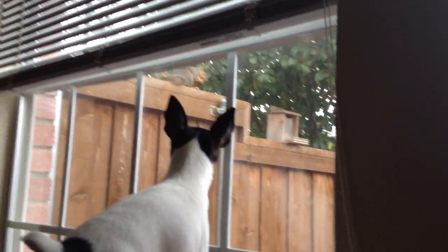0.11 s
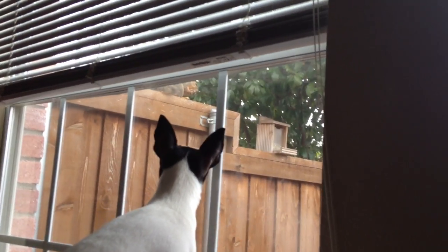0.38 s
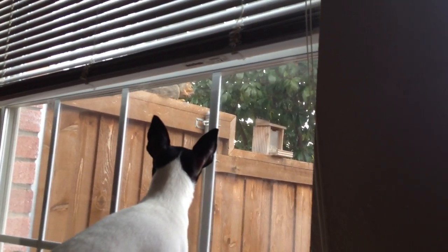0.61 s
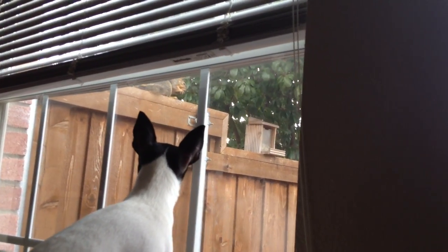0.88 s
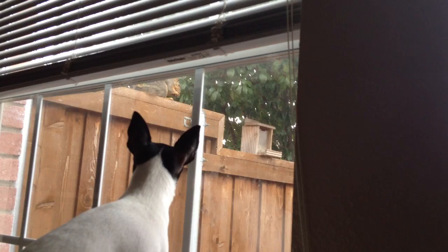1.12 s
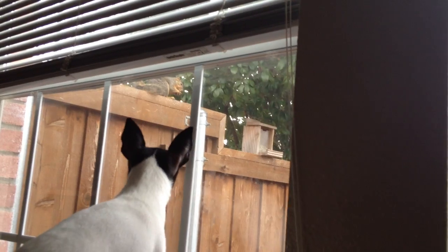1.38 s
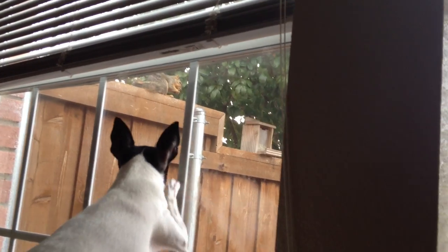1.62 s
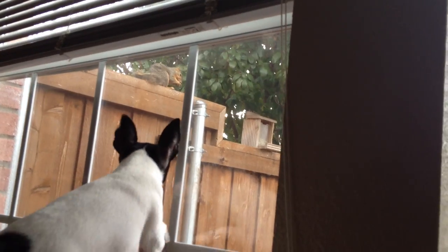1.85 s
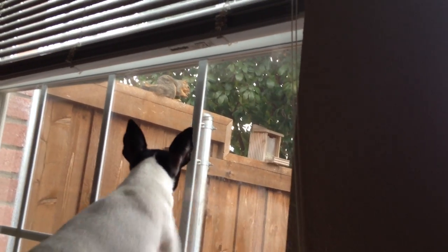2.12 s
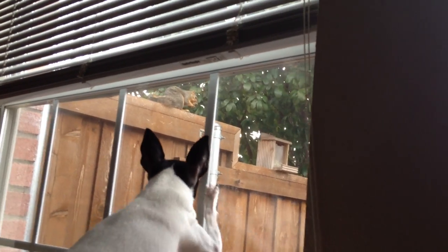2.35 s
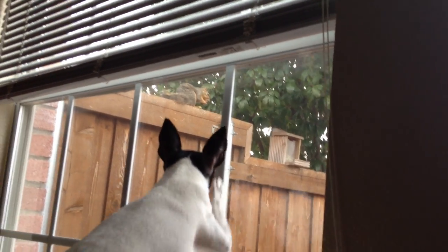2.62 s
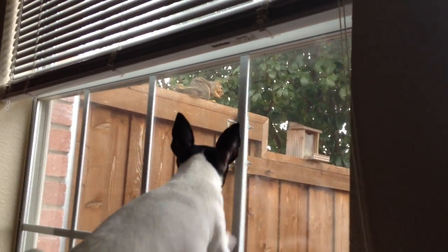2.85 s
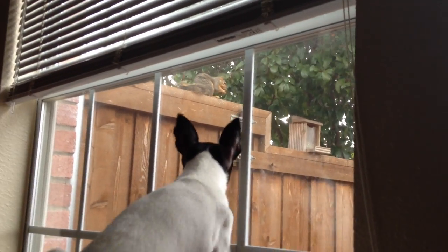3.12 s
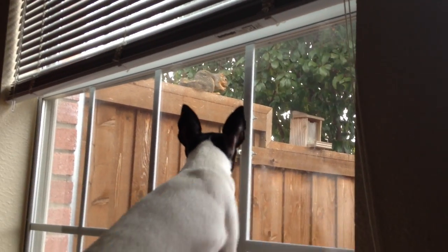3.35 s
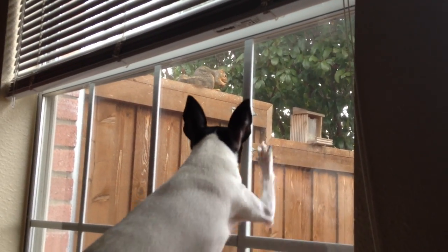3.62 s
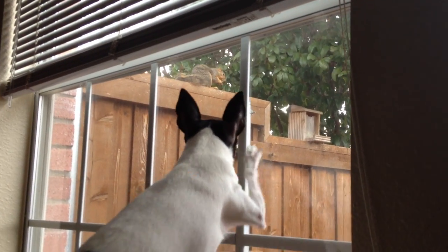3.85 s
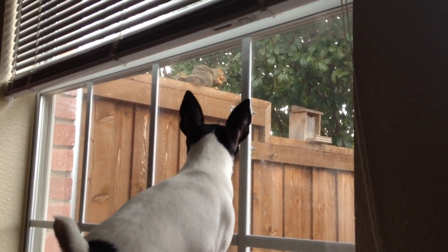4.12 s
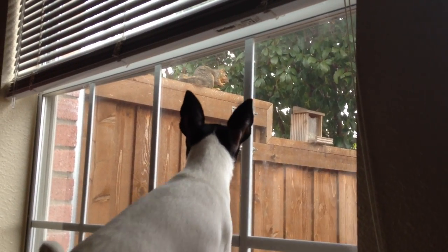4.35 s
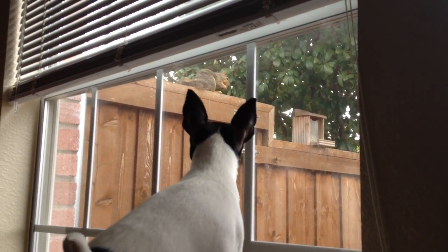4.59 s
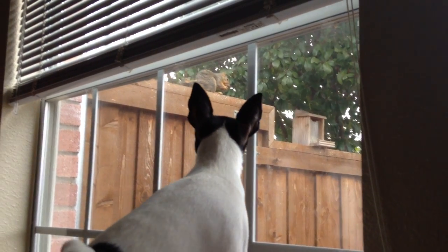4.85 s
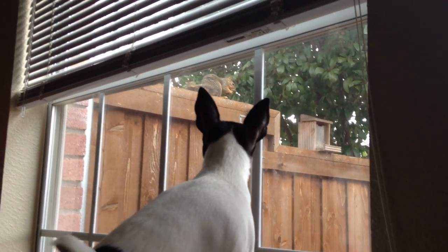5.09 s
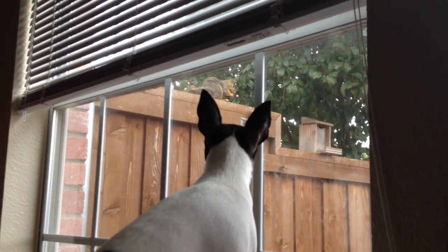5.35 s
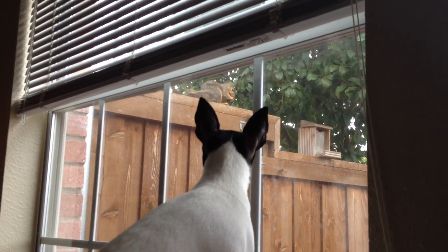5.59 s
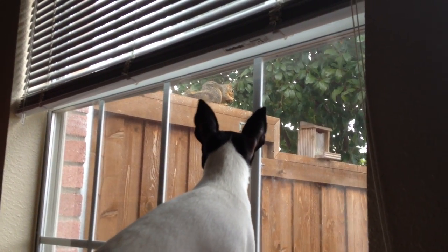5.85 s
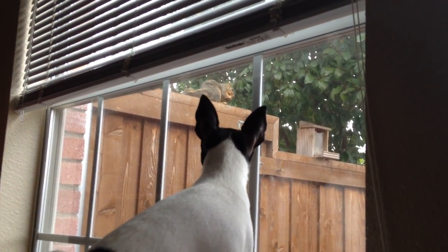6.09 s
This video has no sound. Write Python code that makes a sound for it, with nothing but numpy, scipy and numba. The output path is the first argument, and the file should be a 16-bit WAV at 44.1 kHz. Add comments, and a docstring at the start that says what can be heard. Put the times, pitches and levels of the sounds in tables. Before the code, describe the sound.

Faint room hiss with tiny ticks opens the scene. A small dog close to the microphone growls three times: once briefly, once long and snarling, once lower and building into a clear whine at the very end. Through the first two growls, claws click crisply on window glass and drag lightly down it. The room adds only a short, soft ring.

```python
"""A small dog on a window sill growls three times in a quiet hard-walled room.
The vocal folds buzz in short throbs, 25 to 28 a second, through throat and muzzle; the last growl ends in a
clear whine made of four pure tones. Claws tap the pane with bright bursts of noise and scrape down the glass.
Ticks and creaks are short tones and bands of noise. Fading noise makes the room ring briefly, over a faint
hum and hiss of shaped noise."""
import sys
import numpy as np
from scipy import signal
from scipy.fft import rfft, irfft, next_fast_len
from scipy.io import wavfile
from scipy.ndimage import uniform_filter1d
from numba import njit

SR = 44100
rng = np.random.default_rng(int(sys.argv[2]) if len(sys.argv) > 2 else 0)


def invert_db(level):
    """Linear amplitude ratio for a level in decibels (20 dB per decade), elementwise."""
    return 10 ** (np.asarray(level, dtype=float) / 20)


def int16_out(signal):
    """Quantize to a 16-bit WAV file."""
    q = np.round(np.clip(np.atleast_2d(signal).T, -1, 1) * 32767)
    wavfile.write(sys.argv[1], SR, q.astype(np.int16))


N = 274081
T = np.arange(N) / SR

# colour of the background hiss: (frequency [Hz], relative level [dB])
HISS_COLOUR = [(18, -79), (30, -87), (90, -11.5), (105, -23), (123, 4.5), (151, -9), (235, -5),
               (633, -15.5), (740, -13), (1040, -19.5), (1620, -18), (2390, -22.5), (2940, -24),
               (7500, -26.5), (10000, -33.5), (13000, -28.5), (15200, -29.5)]
# slow change of the hiss: (time [s], level [dB])
HISS_SWELL = [(0, -2), (.08, 1), (.2, -5.5), (4.4, -4), (6.21, -8)]
# how long the room rings: (frequency [Hz], time to fade by 60 dB [s])
ROOM_T60 = [(150, 0.31), (1000, 0.54), (3500, 0.22), (9000, 0.189), (15000, 0.016)]
# small lone ticks nearby: (time [s], level [dB], frequency [Hz], time to fade by 60 dB [s])
TICKS = [(0.1013, -50, 3150, 0.0117), (0.1178, -57, 3200, 0.024), (0.1206, -50.5, 3890, 0.0195),
         (.995, -52, 6370, 0.0061), (1.011, -58, 9500, 0.0096), (1.062, -58, 2756, 0.015),
         (1.089, -47.5, 12200, 0.0047), (4.306, -32.5, 2430, 0.0055), (4.789, -53, 241, 0.12),
         (5.958, -62.5, 2512, 0.008), (4.412, -48, 8276, 0.003243), (6.013, -59.5, 10570, 0.003615)]
# faint thin creaks and chirrups: (start [s], end [s], frequency [Hz], width [Hz], level [dB])
CREAKS = [(0.027, 0.081, 1552, 57, -63), (0.014, 0.106, 640, 61, -68.5), (0.44, 0.68, 3070, 740, -72.5),
          (0.71, 0.8, 2995, 205, -72), (0.76, 0.94, 3630, 380, -74)]
# a claw drags down the glass after a tap: (start [s], peak level [dB], rise [s], fade [dB per s])
SCRAPES = [(1.71, -55, 0.2, 76), (2.42, -60.5, 0.089, 91), (2.73, -52, 0.014, 68), (3.03, -66, 0.23, 39),
           (3.34, -60.5, 0.033, 51), (3.72, -53.5, 0.063, 62), (3.95, -50.5, 0.042, 116)]
# claws on the pane: (time [s], level of the first 200 samples [dB], low share [dB], high share [dB], thud [dB])
TAPS = [(1.708, -35, -5, -1, -62), (1.742, -41.5, -6, -1, -79), (1.782, -47.5, -14, -2, -70),
        (1.812, -44.5, -1.5, 28, -76), (2.098, -38, -6, 0, -91), (2.1282, -51, 0, 4.5, -93),
        (2.186, -53.5, -17.5, -4, -86), (2.2, -40.5, -24, 6.5, -88), (2.2126, -52.5, -4, -6, -88),
        (2.4138, -33, -5.5, -3, -80.5), (2.506, -49, -22, 8.5, -74), (2.729, -33.5, -5.5, -0.5, -77),
        (3.032, -27.5, -6, 2, -64), (3.255, -55.5, -9, -9.5, -73), (3.3355, -34, -2, 0, -70),
        (3.649, -27.5, -7, -1.5, -67), (3.7196, -43.5, -31.5, 1, -64), (3.9449, -29, -4, -0.5, -65)]
# echoes of a tap off frame, sill and blinds: (delay [s], relative level [dB])
TAP_ECHOES = [(.0032, -3), (.006, -7), (.009, -10), (.013, -14)]
# low, middle and high share of a tap: (frequency [Hz], width [Hz])
CLAW_BANDS = [(4000, 3500), (7300, 5000), (12000, 6500)]
# closing whine, before its waver: (time [s], pitch [Hz], level [dB])
WHINE = [(6.012, 305, -39), (6.03, 321, -31), (6.041, 300, -38), (6.047, 263, -30), (6.055, 271, -36),
         (6.062, 328, -31.5), (6.084, 319, -29), (6.092, 300, -36), (6.099, 290, -37), (6.16, 286, -35.5),
         (6.176, 299, -36), (6.21, 300, -38.5)]
# partials of the whine, lowest first: (level against the whine [dB])
WHINE_PARTIALS_DB = (-7.5, 4.5, -19, -29.5)
# soft falling note just before the last growl: (time [s], pitch [Hz], level [dB])
WHIMPER = [(5.268, 531, -77), (5.275, 529, -53), (5.285, 500, -52), (5.295, 462, -49), (5.312, 432, -57),
           (5.32, 428, -78)]
# pace of the throbs, one list a growl: (time [s], throbs gone by [count])
THROB_COUNT = [
    [(1.341, 0), (1.41, 2), (1.525, 5), (1.556, 6), (1.696, 10), (1.775, 12), (1.851, 14), (1.892, 15)],
    [(2.503, 0), (2.524, 1), (2.556, 2), (2.595, 3), (2.642, 4), (2.761, 7), (2.828, 9), (2.904, 11),
     (2.952, 12), (2.994, 13), (3.068, 15), (3.126, 17), (3.16, 18), (3.208, 19), (3.285, 21), (3.333, 22),
     (3.37, 23), (3.42, 24), (3.536, 27), (3.627, 29), (3.664, 30), (3.71, 31), (3.789, 33), (3.843, 34),
     (3.896, 35), (3.937, 36), (4.036, 38), (4.128, 40), (4.225, 42), (4.29, 44)],
    [(5.341, 0), (5.362, 1), (5.446, 3), (5.56, 6), (5.639, 8), (5.706, 10), (5.754, 11), (5.89, 15),
     (5.982, 18), (6.009, 19), (6.085, 21)],
]
# tension of the throat at middling effort: (time [s], flap rate [Hz], voiced share of a throb [0-1])
TENSION = [(1.34, 225, .72), (1.6, 210, .75), (1.75, 235, .85), (1.85, 240, .75), (2.5, 240, .85),
           (2.62, 235, .74), (2.72, 240, .88), (2.8, 240, .86), (2.98, 240, .72), (3.12, 240, .9),
           (3.3, 230, .78), (3.45, 235, .92), (3.55, 235, .72), (3.7, 240, .8), (3.79, 240, .88),
           (3.845, 235, .55), (3.9, 230, .66), (4.0, 225, .76), (4.1, 220, .8), (5.35, 205, .82),
           (5.6, 205, .78), (5.75, 230, .8), (6.0, 280, .86)]
# effort and mouth, one list a growl; the breath is set before its throbbing and the muzzle against the throat:
# (time [s], throb level [dB], throat [Hz], muzzle [Hz], muzzle level [dB], breath level [dB])
MOUTH = [
    [(1.335, -40.5, 534, 1245, -22, -80), (1.41, -32, 609, 1250, -20.5, -72),
     (1.49, -35.5, 523, 1190, -18.5, -68.5), (1.67, -32.5, 530.3, 1210, -13.5, -66.5),
     (1.75, -32.5, 579, 1144, -12, -69), (1.81, -26, 619, 1286, -5, -55.5),
     (1.865, -31.5, 667.5, 1159, -8.5, -59), (1.92, -62, 583, 1134, 5.5, -37)],
    [(2.495, -37.5, 690, 1340, -21, -76), (2.53, -27.5, 624.6, 1488, -15.5, -63.5),
     (2.63, -39.5, 556, 1033, -15, -70), (2.73, -32.5, 598, 1250, -15.5, -67),
     (2.82, -27, 643, 1268, -15, -60), (2.93, -39, 510, 1000, -12.5, -72), (3.09, -30, 616, 1167, -17, -62),
     (3.16, -30.5, 603, 1083, -16, -57), (3.25, -40.5, 543, 1036, -19, -65),
     (3.35, -37, 549, 1054, -15, -66), (3.385, -34, 562.4, 1097, -18.5, -75.5),
     (3.44, -27.5, 655.5, 1216, -10.5, -53.5), (3.57, -37, 590.8, 1121, -12.5, -100),
     (3.7, -32, 565, 1237, -14, -70), (3.77, -30, 566.4, 1257, -11, -60.5),
     (3.86, -41.5, 533, 1020, -17, -72), (3.96, -32, 575, 1260, -16, -62),
     (4.05, -31.5, 617.6, 1093, -16, -72), (4.12, -42.5, 547, 1147, -10.5, -67),
     (4.19, -57.5, 560, 1000, -12.5, -73), (4.29, -62, 520, 900, -7, -80)],
    [(5.27, -49, 494, 1110, -21, -91), (5.345, -52, 500, 1130, -19, -93),
     (5.375, -41.5, 514, 1155, -26.5, -93), (5.45, -39, 480.7, 1095, -21.5, -74),
     (5.55, -37, 482, 997, -31, -76.5), (5.65, -34, 487.4, 980, -22, -68.5),
     (5.79, -34.5, 526, 960, -22.5, -66.5), (5.87, -32, 530, 1022, -23.5, -64),
     (6.0, -33, 532, 973, -22, -61.5), (6.06, -41, 602.7, 1028, -7, -58.5),
     (6.21, -45, 580, 1082, -8.5, -65.5)],
]
# character of each growl: (bared teeth [dB], breath tilt [dB per octave], throat width [Hz],
# muzzle width [Hz], change of the flap rate through a throb [share])
GROWLS = [(-12, 9, 335, 295, .15), (9, 8, 313, 310, .4), (-7, 4, 263, 382, -.05)]
# noise against pulses in the throat: (time [s], noise over pulses [share])
RASP = [(1.3, .2), (1.75, .4), (2.5, .35), (4.2, .4), (5.3, .15), (5.7, .3), (6.0, .4)]
# hiss between bared teeth: (frequency [Hz], width [Hz], relative level [dB])
SNARL = [(2588, 1020, -5.5), (3056, 425, -12.5), (3472, 1140, -19.5)]
# breath resonances of the nose, before the tilt: (frequency [Hz], width [Hz], relative level [dB])
NOSE = [(2230, 1200, -7), (3662, 920, 1), (6252, 850, -8.5), (8154, 370, -19), (9500, 3400, -16.5),
        (12240, 1800, -27), (13730, 6500, -20.5)]
# the dog faces the glass, which throws its voice back: (delay [s], relative level [dB])
PANE_ECHOES = [(.0021, -12), (.0047, -20)]

EFFORT_DB = -34  # throb level that counts as middling effort
GRUNT_S, GRUNT_DB, GRUNT_LENGTH_S = 5.286, -56, 0.03  # one soft throb ahead of the last growl


def unit(x):
    """Scale to an average (rms) level of 1."""
    return x / np.sqrt(np.mean(x ** 2))


@njit
def svf(x, hz, width):
    """Band-pass filter with moving centre and width; it passes its centre at gain 1."""
    y, b, l, last, g = np.empty(len(x)), 0., 0., 0., 0.
    for i in range(len(x)):
        if hz[i] != last:
            last, g = hz[i], np.tan(np.pi * hz[i] / SR)
        k = width[i] / hz[i]
        v = (b + g * (x[i] + 1e-18 * (i & 1) - l)) / (1 + g * (g + k))
        b, l, y[i] = 2 * v - b, l + 2 * g * v, k * v
    return y


def band(x, hz, width_hz):
    """Keep the sound around a fixed or moving frequency."""
    return svf(x, hz + np.zeros(len(x)), width_hz + np.zeros(len(x)))


def twice(x, hz, width_hz):
    """Band-pass two times for steeper sides."""
    return band(band(x, hz, width_hz), hz, width_hz)


def log_curve(points, hz):
    """Read (Hz, value) points on a log-frequency axis."""
    f, v = np.transpose(points)
    return np.interp(np.log(np.maximum(hz, 1)), np.log(f), v)


def over_time(points):
    """Read (s, value) points at every sample."""
    return np.interp(T, *np.transpose(points))


def fade(age, t60):
    """Even dying away, by 60 dB in t60 seconds."""
    return np.exp(-np.log(1000) * age / t60)


def background():
    """Smooth hiss of room and microphone, as coloured noise, with a wavering low hum, as a narrow noise band."""
    hiss_db = -60  # before the swell
    hum_hz, hum_width_hz, hum_db = 120.45, 9, -83.5
    size = next_fast_len(N)
    colour = invert_db(log_curve(HISS_COLOUR, np.arange(size // 2 + 1) * SR / size))
    hiss = irfft(rfft(rng.standard_normal(size)) * colour, size)[:N]
    hiss = invert_db(hiss_db) * unit(hiss)
    hum = invert_db(hum_db) * unit(band(rng.standard_normal(N), hum_hz, hum_width_hz))
    return invert_db(over_time(HISS_SWELL)) * hiss + hum


def room(x, delay_s=0.0091, build_s=0.045):
    """Many blurred reflections: bands of noise, each dying at its own rate."""
    age = np.arange(SR) / SR
    centres = 125 * 2. ** np.arange(8)
    centres[-1] *= .8
    tail = np.zeros(SR)
    for hz in centres:
        tail += band(rng.standard_normal(SR), hz, 0.61 * hz) * fade(age, log_curve(ROOM_T60, hz))
    tail = tail * np.clip((age - delay_s) / build_s, 0, 1)
    return signal.fftconvolve(x, tail / np.sqrt(np.sum(tail ** 2)))[:N]


def ticks(rise_s=0.00037):
    """Tiny hard contacts, each ringing at one pitch."""
    out, age = np.zeros(N), np.arange(SR // 4) / SR
    for t0, db, hz, t60 in TICKS:
        level = invert_db(np.maximum(db - 60 * age / t60, -200))
        tick = np.clip(age / rise_s, 0, 1) * level * np.sin(2 * np.pi * hz * age)
        part = out[int(t0 * SR):][:len(age)]
        part += tick[:len(part)]
    return out


def creaks():
    """Faint bands of noise that each swell and fade once."""
    out = np.zeros(N)
    for t0, t1, hz, width, db in CREAKS:
        swell = np.sin(np.pi * np.clip((T - t0) / (t1 - t0), 0, 1))
        out += invert_db(db) * swell * unit(band(rng.standard_normal(N), hz, width))
    return out


def scrape(grain_db=-2.0):
    """Dense uneven grains of horn on glass, bright and broad."""
    unevenness = unit(uniform_filter1d(rng.standard_normal(N), size=60))
    grains = rng.standard_normal(N) * invert_db(grain_db * unevenness)
    hiss = unit(band(grains, 5640, 9000) + invert_db(-16.0) * band(grains, 12300, 5000))
    level = np.zeros(N)
    for t0, db, rise_s, fade_db in SCRAPES:
        rise = np.clip((T - t0) / rise_s, 0, 1)
        level += rise * invert_db(db - fade_db * np.clip(T - t0 - rise_s, 0, None))
    return level * hiss


def claws(point=6., tick_s=0.00065, rattle_t60_s=0.073, rattle_db=0.0, thud_hz=52.5, thud_t60_s=0.77):
    """Each tap: a tick, its close echoes, a short rattle and ring of the pane, and a thud through the wall."""
    ring_hz, ring_width_hz, ring_db, ring_t60_s = 6992, 700, -21, 9
    out, age = np.zeros(N + SR), np.arange(SR // 8) / SR  # every tap is cut off after 1/8 s
    build = np.clip(age / TAP_ECHOES[0][0], 0, 1)  # full by the first echo
    push = np.exp(-age / tick_s) + invert_db(rattle_db) * fade(age, rattle_t60_s) * build ** 2
    for lag, db in TAP_ECHOES:
        push = push + invert_db(db) * (age > lag) * np.exp(-np.abs(age - lag) / tick_s)
    for t0, db, low_db, high_db, thud_db in TAPS:
        grit = rng.standard_normal(len(age))
        contact = push * grit + point * (age == 0)
        low, middle, high = (twice(contact, hz, width) for hz, width in CLAW_BANDS)
        # a blunter claw favours the low share, a sharper one the high share
        snap = invert_db(low_db) * low - middle + invert_db(high_db) * high
        ring = fade(age, ring_t60_s) * build * twice(grit, ring_hz, ring_width_hz)
        snap = snap + invert_db(ring_db) * ring
        snap = invert_db(db) * snap / np.sqrt(np.mean(snap[:200] ** 2))
        thud = invert_db(thud_db) * fade(age, thud_t60_s) * unit(band(grit, thud_hz, thud_hz))
        out[int(t0 * SR):][:len(age)] += snap + thud
    return out[:N]


def whimper():
    """A soft falling note, one pure tone, beside the lone throb."""
    s, hz, db = np.transpose(WHIMPER)
    level = np.sqrt(2) * invert_db(np.interp(T, s, db, -200, -200))
    return level * np.sin(2 * np.pi * np.cumsum(np.interp(T, s, hz)) / SR)


def whine(onset_s=0.0075, waver=.016):
    """The folds lock into a steady vibration: four clean partials whose pitch wavers a little (a share of it)."""
    s, hz, level_db = np.transpose(WHINE)
    drift = unit(uniform_filter1d(rng.standard_normal(N), size=400))
    phase = 2 * np.pi * np.cumsum(np.interp(T, s, hz) * (1 + waver * drift)) / SR
    level_db = np.interp(T, s, level_db)
    tone = np.zeros(N)
    for k, db in enumerate(WHINE_PARTIALS_DB):
        tone += np.sqrt(2) * invert_db(level_db + db) * np.sin((k + 1) * phase)
    return tone * np.clip((T - s[0]) / onset_s, 0, 1)


@njit
def flap(hz, throb, stretch, size):
    """The folds send a pulse at each turn of their cycle; a new throb restarts the cycle."""
    pulses, phase, p, k = np.zeros(len(hz) + 1), np.empty(len(hz)), 0., 0
    for i in range(1, len(hz)):
        step = hz[i] * stretch[k] / SR
        p = p + step if throb[i] == throb[i - 1] else 1.
        if p >= 1:
            p, k = p - 1, k + 1
            # shared between two samples, so that it can fall in between
            pulses[i] += size[k] * p / step
            pulses[i + 1] += size[k] * (1 - p / step)
        phase[i] = p
    return pulses[:-1], phase


def throbs():
    """Start, level, flap rate and length of every throb: pace, effort and tension set them, chance stirs most."""
    duty_per_db, flap_hz_per_db = 0.01528, 3.  # more effort: longer voiced share, faster flap
    scatter_db, duty_scatter, flap_scatter = .7, .06, .07  # the last two are shares
    start, period = [GRUNT_S], [1.]
    for pace in THROB_COUNT:
        s, gone = np.transpose(pace)
        times = np.interp(np.arange(gone[-1] + 1), gone, s)
        start, period = np.r_[start, times[:-1]], np.r_[period, np.diff(times)]
    period, start = period[np.argsort(start)], np.sort(start)
    s, mouth_db = np.transpose(np.vstack(MOUTH))[:2]
    chance = rng.standard_normal((128, 3))[:len(start)].T
    lone = start == GRUNT_S
    db = np.interp(start + period / 3, s, mouth_db) + scatter_db * chance[0]
    db = np.where(lone, GRUNT_DB, db)
    effort = np.clip(db - EFFORT_DB, -10, 10)
    s, slack_hz, share = np.transpose(TENSION)
    duty = (np.interp(start, s, share) + duty_per_db * effort) * (1 + duty_scatter * chance[1])
    flap_hz = (np.interp(start, s, slack_hz) + flap_hz_per_db * effort) * (1 + flap_scatter * chance[2])
    return start, db, flap_hz, np.where(lone, GRUNT_LENGTH_S, duty * period)


def throb_gate(start, db, length, rise_s, fall_s=0.007, swell_db=2.0):
    """Loudness of the voice: each throb swells, then chokes off."""
    gate, age = np.zeros(N), np.arange(SR // 8) / SR
    for t0, peak_db, span in zip(start, db, length):
        rise = np.clip(age / rise_s / 2, 0, 1)
        shape = rise / (1 + np.exp(np.clip((age - span) / fall_s * 2, None, 50)))
        shape = shape * invert_db(swell_db * (np.clip(age / span, 0, 1) - .5))
        part = gate[int((t0 - rise_s) * SR):][:len(age)]
        part += invert_db(peak_db) * shape[:len(part)]
    return gate


def resonances(air, rows, tilt_db=0.):
    """Noise through several resonances, tilted in level around the second one."""
    total = np.zeros(N)
    for hz, width, db in rows:
        total += invert_db(db + tilt_db * np.log2(hz / rows[1][0])) * unit(twice(air, hz, width))
    return total


def growl(rise_s=0.005, lead_s=.0015, fill_db=-17.0, glide=0.092, flutter_db=1.5, chest_buzz_db=-1.5):
    """Fold pulses in throbs ring chest, throat, muzzle and palate; a flap flutters below; breath hisses."""
    fold_base_hz, fold_scatter = 167, .05  # scatter from throb to throb, as a share
    jitter, shimmer_db, muzzle_rasp = .045, 2, .8  # uneven pulse spacing and size; noise over pulses
    chest_base_db, chest_db_per_db, chest_width_hz = -3.5, -0.58, 128.7
    chest_join_s, chest_join_db = 0.093, -16.5  # the chest joins late when the voice sets in
    snarl_per_muzzle_db = 2
    palate_ratio, palate_width_hz, palate_db = 1.3148, 300, 0.5  # times muzzle Hz; over the snarl
    breath_throb, breath_hold_s = .5, 0.044  # share of the breath that pulses with the throbs

    start, db, flap_hz, length = throbs()
    start = start - lead_s  # the folds catch just before the throb is full
    s, *columns = np.transpose(np.vstack(MOUTH))
    effort_db, throat_hz, muzzle_hz, muzzle_db, breath_db = (np.interp(T, s, c) for c in columns)
    # which growl each sample belongs to
    which = np.clip(np.searchsorted([rows[-1][0] + .2 for rows in MOUTH], T), 0, len(MOUTH) - 1)
    teeth_db, tilt_db, throat_width, muzzle_width, flutter_glide = np.transpose(GROWLS)[:, which]
    chest_db = chest_base_db + chest_db_per_db * np.clip(effort_db - EFFORT_DB, -10, 10)
    voiced_s = T - np.array([MOUTH[0][0][0], MOUTH[1][0][0], GRUNT_S])[which]
    chest_db = chest_db + chest_join_db * np.clip(1 - voiced_s / chest_join_s, 0, 1)
    snarl_db = teeth_db + snarl_per_muzzle_db * muzzle_db
    now = np.clip(np.searchsorted(start - rise_s, T) - 1, 0, None)  # number of the current throb
    gate = throb_gate(start, db, length, rise_s)

    # the folds speed up through each throb as the pressure builds
    progress = np.clip((T - start[now]) / length[now], 0, 1) - .5
    fold_hz = fold_base_hz * (1 + fold_scatter * rng.standard_normal(len(start)))
    fold_hz = fold_hz[now] * (1 + glide * progress)
    chance = rng.standard_normal((N // 50, 2)).T
    pulses, phase = flap(fold_hz, now, 1 + jitter * chance[0], invert_db(shimmer_db * chance[1]))
    buzz = unit(pulses - pulses.mean())
    air = unit(np.exp(-phase / .5) * rng.standard_normal(N))  # a puff of noise after each pulse
    rasp = over_time(RASP)

    def resonate(noise_share, hz, width):
        """Three band-passes in a row; a narrow one is made up in level."""
        source = gate * (buzz + noise_share * air)
        return np.sqrt(SR / width) * band(twice(source, hz, width), hz, width)

    flutter_hz = uniform_filter1d(flap_hz[now] * (1 + flutter_glide * progress), size=100)
    flutter = uniform_filter1d(gate, size=300) * np.sin(2 * np.pi * np.cumsum(flutter_hz) / SR)
    chest = invert_db(chest_buzz_db) * resonate(rasp, flutter_hz, chest_width_hz) + invert_db(flutter_db) * flutter
    throat = resonate(rasp, throat_hz, throat_width)
    # turbulence at the teeth roughens the muzzle resonance more than the throat
    muzzle = resonate(muzzle_rasp, muzzle_hz, muzzle_width)
    # a resonance above the muzzle opens with the snarl
    palate = resonate(muzzle_rasp, palate_ratio * muzzle_hz, palate_width_hz)
    # turbulence between throat and muzzle hisses in the gap between their resonances
    gap_hz = (throat_hz + muzzle_hz) / 2
    gap = np.sqrt(SR / 420) * band(twice(gate * air, gap_hz, 360.0), gap_hz, 360.0)
    voice = throat + invert_db(chest_db) * chest - invert_db(muzzle_db) * muzzle
    voice = voice + invert_db(snarl_db + palate_db) * palate + invert_db(fill_db) * gap
    # a small body radiates no bass; the nearly closed muzzle swallows the treble
    voice = signal.sosfilt(signal.butter(3, (207, 2400), "band", fs=SR, output="sos"), voice)

    snarl = invert_db(snarl_db) * uniform_filter1d(gate, size=900) * resonances(air, SNARL)
    whining = T > WHINE[0][0]  # the breath keeps flowing through the whine
    flow = uniform_filter1d(1. * ((gate > 1e-4) | whining), int(breath_hold_s * SR))
    pulsing = np.clip(gate / invert_db(effort_db), whining, 2)
    flow = flow * (1 - breath_throb + breath_throb * pulsing)
    breath = invert_db(breath_db) * flow * resonances(air, NOSE, tilt_db)
    return voice + snarl + breath


def scene(dog_room_db=-15, whine_room_db=-24, claw_room_db=-9.5, tick_room_db=-18.5):
    """Dog, claws and ticks, direct and through the room, over the background."""
    dog = growl()
    taps = claws() + scrape()
    small = ticks() + creaks()
    dog = dog + sum(invert_db(db) * np.interp(T - lag, T, dog) for lag, db in PANE_ECHOES)
    tone = whine() + whimper()
    to_room = invert_db(dog_room_db) * dog + invert_db(whine_room_db) * tone
    to_room = to_room + invert_db(claw_room_db) * taps + invert_db(tick_room_db) * small
    return (dog + tone + taps + small + room(to_room) + background())[None]


def low_pass(x):
    """Removes everything above the highest recorded frequency."""
    return signal.sosfilt(signal.butter(12, 16510, fs=SR, output="sos"), x)


def record(dry):
    """The phone thins the bass below 30 Hz and cuts the top above 15300 Hz."""
    thinned = signal.sosfilt(signal.butter(1, 30, "high", fs=SR, output="sos"), dry)
    mix = signal.sosfilt(signal.ellip(8, .2, 45, 15300, fs=SR, output="sos"), thinned)
    return low_pass(mix)


dry = scene()
out = record(dry)
int16_out(out)
```